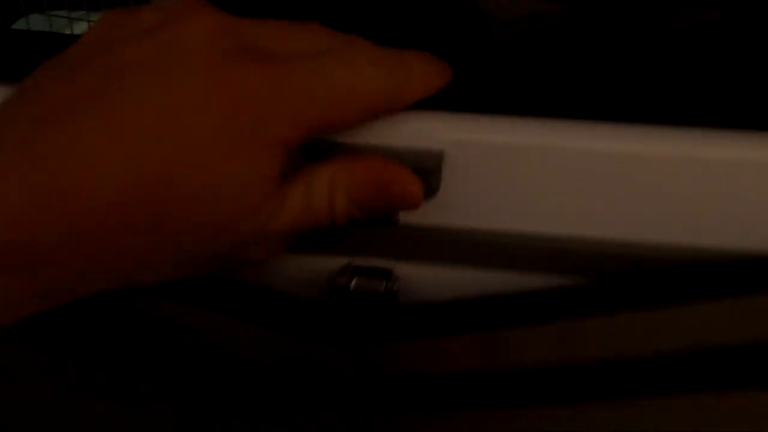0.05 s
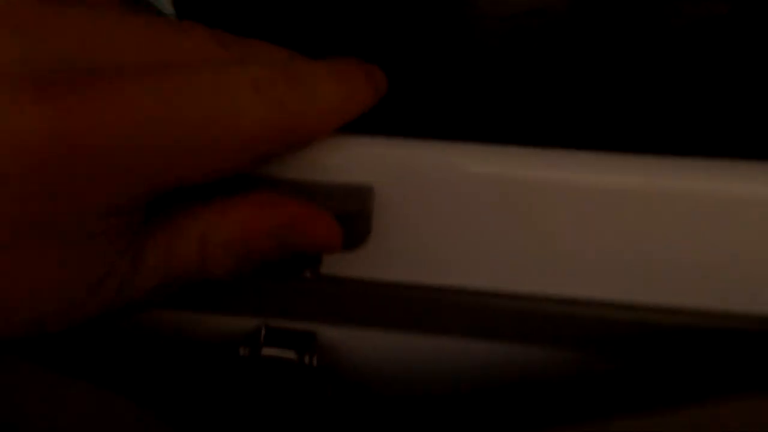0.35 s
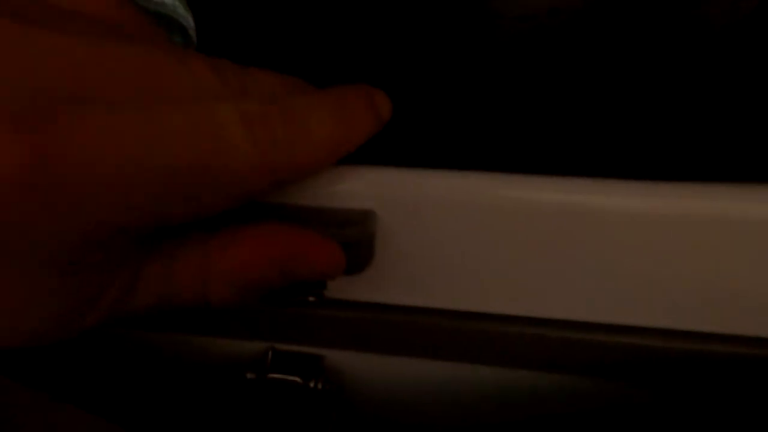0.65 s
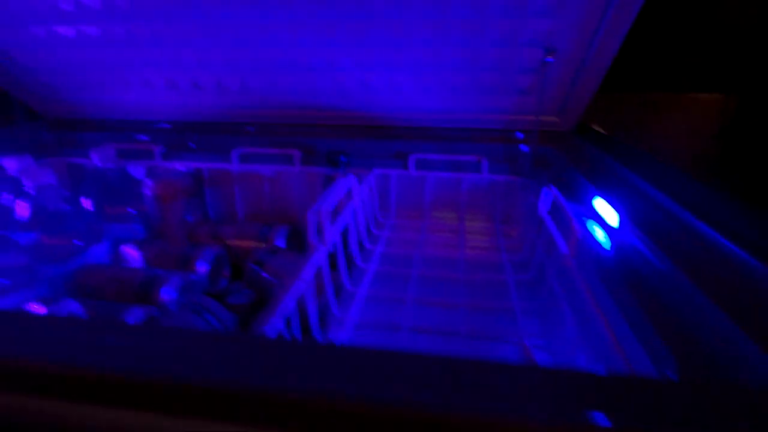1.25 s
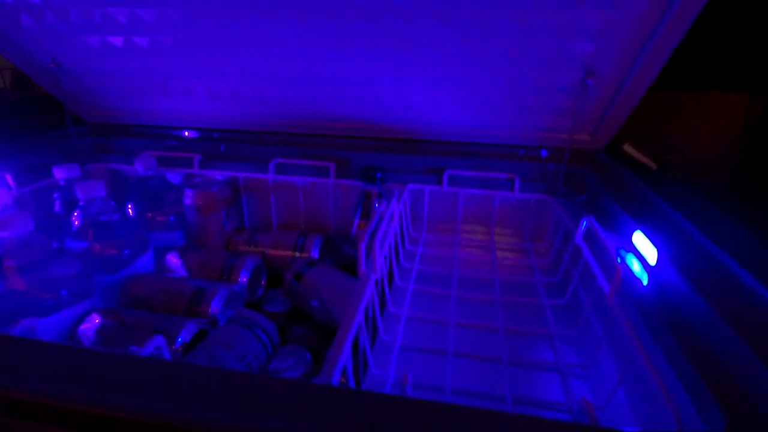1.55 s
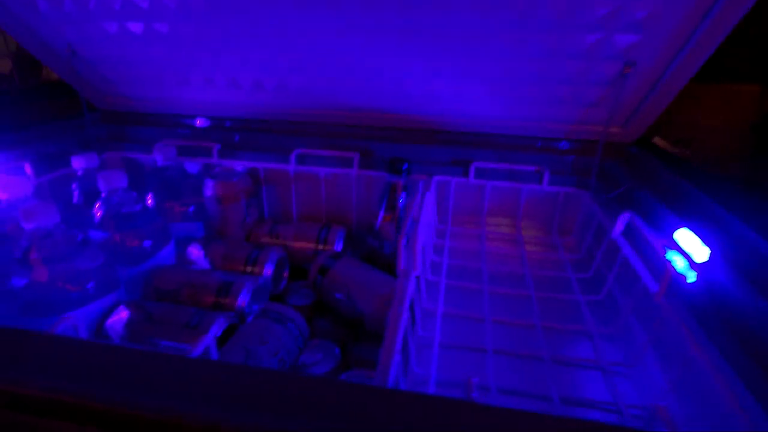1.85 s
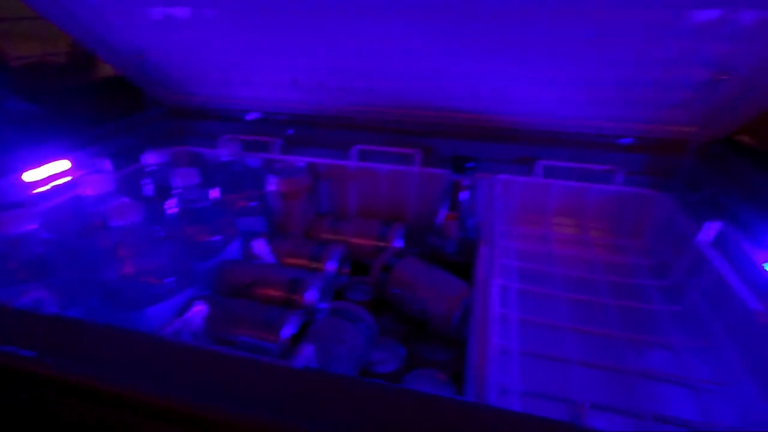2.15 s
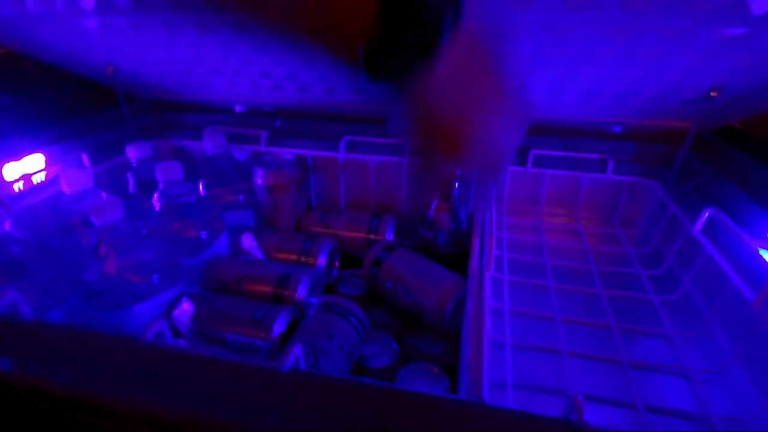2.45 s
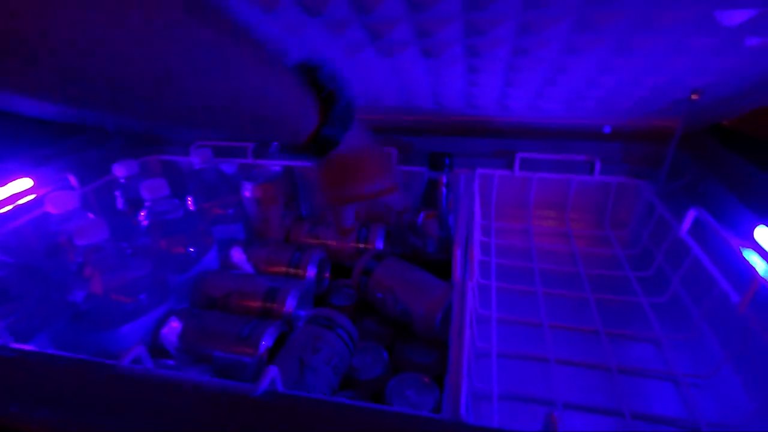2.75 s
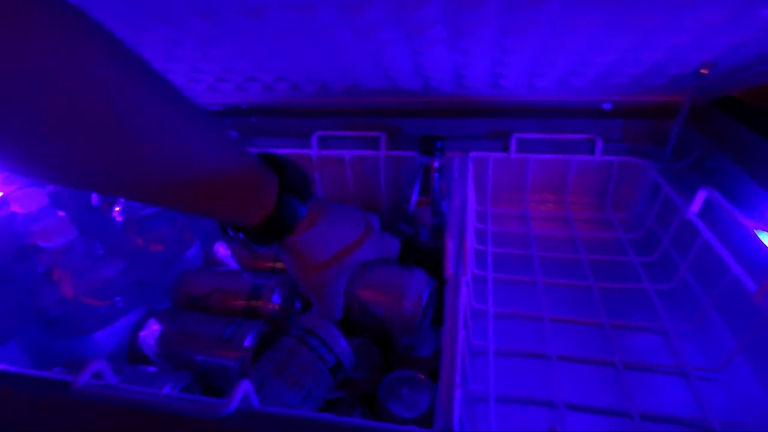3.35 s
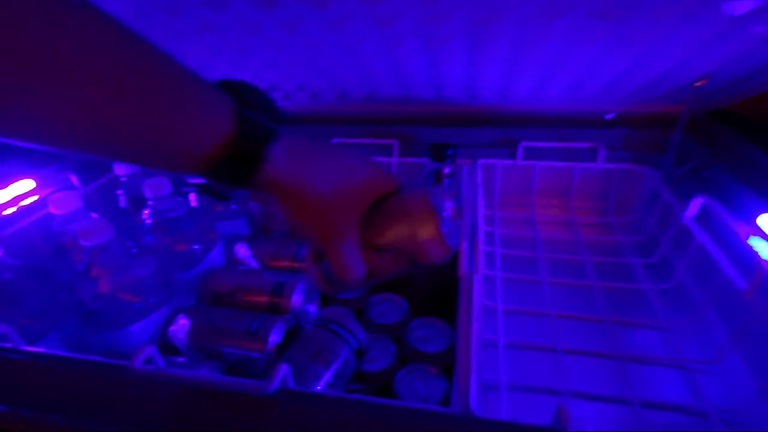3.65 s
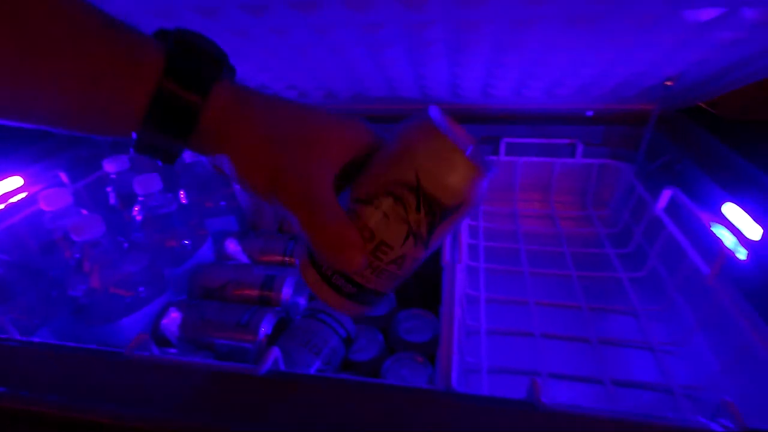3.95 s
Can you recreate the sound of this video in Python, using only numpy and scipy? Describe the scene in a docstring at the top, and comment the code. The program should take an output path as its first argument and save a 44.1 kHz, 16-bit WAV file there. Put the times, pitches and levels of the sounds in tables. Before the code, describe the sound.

A chest cooler lid opens with a short rubber slurp, ticking hinges and a thump. An arm then rustles inside and drink cans clatter against the hollow liner. The cooler's motor and fan hum throughout, heard close indoors.

```python
"""A refrigeration motor throbs steadily under the rush of its fan. A sleeve rustles and fingers creak
on the lid of a chest cooler. The rubber seal peels free with a short slurp, the flexing lid groans,
the hinges tick, and a spring rasps as the lid thumps against its stop. An arm rustles in among the
drinks and pulls out a full can, which knocks against its neighbours and the booming liner."""
import sys
import numpy as np
from scipy import signal
from scipy.fft import rfft, irfft
from scipy.io import wavfile

SR = 44100
rng = np.random.default_rng(int(sys.argv[2]) if len(sys.argv) > 2 else 0)


def bounce(signal):
    """Save signal as a 16-bit WAV file at the path given by the first command-line argument."""
    frames = np.transpose(np.atleast_2d(signal))
    limited = np.clip(frames, -1, 1)
    pcm = np.round(limited * 32767).astype(np.int16)
    wavfile.write(sys.argv[1], SR, pcm)


N = 176400
TIME = np.arange(N) / SR


def amp(db):
    return 10 ** (np.asarray(db) / 20)


def unit_rms(x):
    return x / np.sqrt(np.mean(x ** 2) + 1e-20)


def at_hz(table, hz):
    """Table value on a log-frequency axis."""
    table_hz, value = np.transpose(table)
    return np.interp(np.log(hz + 1), np.log(table_hz + 1), value)


def envelope(table):
    """Gain curve from (time [s], level [dB])."""
    return amp(np.interp(TIME, *np.transpose(table)))


def add(mix, start_s, sound):
    part = mix[round(start_s * SR):][:len(sound)]
    part += sound[:len(part)]


def spectral_gain(spectrum, hz, tilt_db_oct):
    return amp(at_hz(spectrum, hz) + tilt_db_oct * np.log2(np.maximum(hz, 200)))


def colour(x, spectrum):
    """x shaped by a spectrum, rms 1."""
    hz = np.fft.rfftfreq(len(x), 1 / SR)
    return unit_rms(irfft(rfft(x) * spectral_gain(spectrum, hz, 0), len(x)))


def drift(rate_hz):
    """Random wander up to about rate_hz, rms 1."""
    lowpass = np.exp(-(np.fft.rfftfreq(N, 1 / SR) / rate_hz) ** 2)
    return unit_rms(irfft(rfft(rng.standard_normal(N)) * lowpass, N))


def grains(spread_db):
    """Noise in uneven clumps, as from friction."""
    return rng.standard_normal(N) * amp(spread_db * drift(260))


def decaying_noise(samples, t60_table):
    """Noise with a separate decay per octave."""
    octave = np.log2(np.fft.rfftfreq(samples, 1 / SR) + 1)
    centres = np.arange(7, 15)
    bins = rfft(rng.standard_normal(samples))
    out = np.zeros(samples)
    for centre in centres:
        band = irfft(bins * np.interp(octave, centres, centres == centre), samples)
        out += band * np.exp(-np.log(1000) * TIME[:samples] / at_hz(t60_table, 2. ** centre))
    return out


def crack(spectrum, t60_table, tilt_db_oct=0):
    """Dense, brief ringing of a contact: decaying noise through a minimum-phase filter."""
    hz = abs(np.fft.fftfreq(4096, 1 / SR))
    log_gain = np.log(spectral_gain(spectrum, hz, tilt_db_oct))
    taps = np.fft.ifft(np.exp(np.conj(signal.hilbert(log_gain)))).real[:len(hz) // 2]
    onset_boost = amp(2 * np.exp(-TIME[:SR // 2] / 0.00058))
    burst = onset_boost * decaying_noise(SR // 2, t60_table)
    return signal.fftconvolve(burst, taps / np.linalg.norm(taps))


def ring(modes, rise_s=0.0012, detune=0, vary_db=2):
    """Damped modes; each blow scatters their levels and, with detune, their pitches."""
    t = TIME[:SR]
    out = np.zeros(SR)
    for hz, db, t60_s in modes:
        level_draw, pitch_draw = rng.standard_normal(2)
        decay = amp(db + vary_db * level_draw) * np.exp(-np.log(1000) * t / t60_s)
        out += decay * np.sin(2 * np.pi * hz * (1 + detune * pitch_draw) * t)
    return out * (1 - np.exp(-t / rise_s))


# Motor hum: (shaft order [1], level [dB])
HUM_ORDERS = [(1, -27.5), (2, -24.5), (3, -42.5), (4, -43.5), (5, -45), (6, -36.5), (7, -44), (8, -50.5),
              (10, -49.5), (13, -53), (14, -68), (19, -77), (20, -57.5)]
# Rumble: (frequency [Hz], relative density [dB])
RUMBLE_SPECTRUM = [(10, -18), (20, -11), (34, -27), (48, -3.5), (62, -0.5), (85, -11.5), (110, 9), (140, 1),
                   (180, -6), (230, -9.5), (330, -10), (450, -16), (600, -47), (1200, -73.5)]
# Hum and rumble swells: (time [s], gain [dB])
HUM_ENVELOPE = [(0, 0), (.4, -0.5), (.8, 2.5), (1.15, -3.5), (1.35, -0.5), (1.8, -4.5), (2.3, 0.5),
                (3.3, 1), (3.65, -0.5), (3.87, -7.5), (4, -4.5)]
RUMBLE_ENVELOPE = [(0, 1.5), (.5, -0.5), (.85, 1), (1.05, 0), (1.2, -0.5), (1.6, -0.5), (1.85, -3),
                   (2.3, 0), (2.6, -0.5), (3.3, 0), (3.65, 3.5), (3.87, -7.5), (4, -3.5)]
SHAFT_HZ = 23.9


def motor(waver=0.0036, flutter_db=2.02, rumble_db=-30.5):
    """Wavering shaft orders over a low rumble."""
    turns = np.cumsum(SHAFT_HZ * (1 + waver * drift(3.88))) / SR
    hum = np.zeros(N)
    for order, db in HUM_ORDERS:
        peak = np.sqrt(2) * amp(db + flutter_db * drift(2.7))
        hum += peak * np.sin(2 * np.pi * (order * turns + rng.random()))
    rumble = amp(rumble_db) * colour(rng.standard_normal(N), RUMBLE_SPECTRUM)
    return hum * envelope(HUM_ENVELOPE) + rumble * envelope(RUMBLE_ENVELOPE)


# Fan air and treble hiss: (frequency [Hz], relative density [dB])
AIR_SPECTRUM = [(260, -26), (450, -5.5), (600, 2), (786, -1.5), (1000, -5), (1250, -7), (1500, -9),
                (1850, -9), (2200, -13), (2600, -17.5), (3310, -18.5), (4640, -29), (7420, -34),
                (10000, -43), (12600, -63), (15000, -69.5)]
HISS_SPECTRUM = [(1200, -26), (2500, 6), (3500, 4.5), (5000, -7.5), (7500, -6), (10000, -19.5),
                 (12600, -25.5), (15000, -38)]
# Air and hiss swells: (time [s], gain [dB])
AIR_ENVELOPE = [(0, 2), (.45, 3), (.75, 0.5), (1.1, 0.5), (1.4, 2), (1.62, -5.5), (1.75, -4.5), (2, -3.5),
                (2.25, -2.5), (2.35, -1), (3.1, -3.5), (3.4, -4), (3.65, -2), (3.9, -10), (4, -10)]
HISS_ENVELOPE = [(0, -58.5), (.35, -61.5), (.75, -61), (1.15, -60), (1.4, -56), (1.53, -63), (1.7, -80),
                 (2.25, -79), (2.35, -64), (3.2, -61), (3.35, -57.5), (3.7, -56), (3.9, -65.5), (4, -69)]
# Cabinet and fan tones: (frequency [Hz], level [dB])
FAN_TONES = [(361, -57), (587, -64.5), (1077, -64), (1590, -63), (1852, -68), (3290, -69)]


def fan(air_db=-46, throb_db=0.9, flutter_db=1.2, tone_waver=0.005):
    """Air throbbing at twice the shaft rate, fine hiss, and faint tones that come and go."""
    throb = amp(throb_db * np.sin(2 * np.pi * 2 * SHAFT_HZ * TIME) + flutter_db * drift(25))
    air = amp(air_db) * colour(rng.standard_normal(N), AIR_SPECTRUM) * throb * envelope(AIR_ENVELOPE)
    hiss = colour(grains(3.0), HISS_SPECTRUM) * envelope(HISS_ENVELOPE)
    tones = np.zeros(N)
    for hz, db in FAN_TONES:
        gain = amp(db) * drift(7.6)
        tones += gain * np.sin(2 * np.pi * np.cumsum(hz * (1 + tone_waver * drift(21.2))) / SR)
    return air + hiss + tones


# Arm strokes: (peak time [s], rise [s], fall [s], level [dB])
ARM_STROKES = [(.13, 0.035, 0.034, -55.5), (.3, 0.077, .05, -58.5), (.48, 0.045, 0.07, -57.5),
               (.59, 0.037, 0.049, -56), (.73, 0.032, .04, -55.5), (.87, 0.035, 0.14, -48),
               (2.15, 0.049, .05, -58.5), (2.31, 0.032, 0.05, -59.5), (2.57, 0.16, 0.06, -53.5),
               (2.76, 0.17, 0.13, -52.5), (2.92, 0.089, 0.16, -46.5), (3.13, 0.036, 0.057, -58),
               (3.26, 0.054, 0.021, -55), (3.55, 0.067, 0.23, -48.5)]
# Cloth and skin: (frequency [Hz], relative density [dB])
RUSTLE_SPECTRUM = [(300, -29), (1000, -1.5), (2200, 4.5), (4000, 4.5), (6500, -2), (9000, -6), (12000, -21),
                   (15000, -25)]


def arm_rustle():
    """Cloth and skin rub in grainy strokes."""
    strokes = np.zeros(N)
    for peak_s, rise_s, fall_s, db in ARM_STROKES:
        width_s = np.where(TIME < peak_s, rise_s, fall_s)
        strokes += amp(db) * np.exp(-((TIME - peak_s) / width_s) ** 2)
    return strokes * colour(grains(spread_db=1.5), RUSTLE_SPECTRUM)


# Finger creak: (frequency [Hz], relative density [dB])
GRIP_SPECTRUM = [(800, -26), (1400, 4), (1800, 10), (2300, -19), (4000, -21), (8000, -23), (15000, -39)]


def finger_grip(peak_s=0.41, width_s=0.064, db=-46.5, slip_hz=100.9, jitter=0.15, decay_cycles=0.22):
    """Fingers creak on the lid's edge in quick slips."""
    cycles = np.cumsum(slip_hz * (1 + jitter * drift(30))) / SR
    slips = np.exp(-(cycles % 1) / decay_cycles)
    swell = amp(db) * np.exp(-((TIME - peak_s) / width_s) ** 2)
    return swell * colour(slips * rng.standard_normal(N), GRIP_SPECTRUM)


# Seal peeling: (time [s], gap resonance [Hz], slurp [dB], hiss [dB])
SEAL_PEEL = [(0.794, 400, -48, -53), (.809, 601, -36, -47), (0.814, 794, -22.5, -31.5),
             (0.83, 1003, -20, -28), (.842, 1145, -23.5, -29.5), (.846, 1212, -30, -24.5),
             (0.853, 1277, -24.5, -32.5), (.864, 1090, -35, -29.5), (.876, 1007, -28.5, -37),
             (.89, 907, -43, -43), (.94, 850, -60, -57)]
# Inrushing air: (frequency [Hz], relative density [dB])
INRUSH_SPECTRUM = [(200, 10), (450, 11), (650, 18), (900, 6), (1500, -2.5), (2800, 4.5), (4000, -7.5),
                   (5300, -11), (6300, -4), (7500, -17), (10000, -29), (15000, -39)]


def seal_peel(cycles_per_flap=4, jitter=0.05, pole_width_hz=650, noise_mix=0.4, squeak_mix=0.6):
    """The gasket flutters; flutter and gap resonance rise and fall together while air hisses in."""
    times_s, *columns = np.transpose(SEAL_PEEL)
    gap_hz, slurp_db, hiss_db = (np.interp(TIME, times_s, column) for column in columns)
    flap_hz = gap_hz / cycles_per_flap * np.exp(jitter * drift(224))
    flaps = np.diff(np.floor(np.cumsum(flap_hz) / SR), prepend=0)
    drive = unit_rms(flaps) + noise_mix * rng.standard_normal(N)
    # Moving resonance: shift down by gap_hz, low-pass, shift back.
    carrier = np.exp(2j * np.pi * np.cumsum(gap_hz) / SR)
    pole = np.exp(-np.pi * pole_width_hz / SR)
    resonance = carrier * signal.lfilter([1], np.poly([pole] * 3), drive / carrier)
    slurp = unit_rms(unit_rms(resonance.real) + squeak_mix * carrier.imag)
    hiss = colour(grains(0.92), INRUSH_SPECTRUM)
    peeling = (TIME > times_s[0]) & (TIME < times_s[-1])
    return (amp(slurp_db) * slurp + amp(hiss_db) * hiss) * peeling


# Lid flexes: (time [s], length [s], first pitch [Hz], last pitch [Hz], level [dB], overtone gain [dB])
LID_GROANS = [(.874, 0.05, 132.5, 105, -16.5, -10), (.956, 0.06, 166, 150, -21.5, -23),
              (1.022, 0.039, 172, 103, -16, -15), (1.455, 0.052, 85, 117, -8.5, -28),
              (1.512, 0.065, 127.5, 152, -14.5, -12)]


def lid_groans(waver=0.04, skew=0.66):
    """The flexing lid sounds short low notes that bend in pitch."""
    out = np.zeros(N)
    for start_s, length_s, first_hz, last_hz, db, overtone_db in LID_GROANS:
        progress = np.linspace(0, 1, round(length_s * SR))
        glide_hz = first_hz + (last_hz - first_hz) * progress
        phase = 2 * np.pi * np.cumsum(glide_hz * (1 + waver * drift(55)[:len(progress)])) / SR
        tone = np.sin(phase) + amp(overtone_db) * (np.sin(2 * phase) + np.sin(3 * phase) / 3)
        swell = np.sin(np.pi * progress ** skew) ** 2
        add(out, start_s, amp(db) * swell * tone)
    return out


# Hinge ticks: (time [s], tick [dB], hollow knock [dB], lid ring [dB])
HINGE_TICKS = [(.9585, -28, -24, -25), (.982, -45, -43, -32), (1.012, -50, -36, -32),
               (1.025, -47, -32, -28), (1.0855, -33.5, -27, -39), (1.235, -37, -32, -50)]
# Tick colour: (frequency [Hz], relative density [dB])
TICK_SPECTRUM = [(150, 0), (400, 1), (800, -4), (2100, -2), (3500, -5.5), (5000, -21), (9000, -32.5),
                 (15000, -51)]
# Tick decay: (frequency [Hz], t60 [s])
TICK_DECAY = [(200, .12), (2000, .05), (9000, .024)]
# Lid's hollow knock and ring: (frequency [Hz], gain [dB], t60 [s])
HOLLOW_MODES = [(344, 8, 0.053), (400, -2, 0.099), (476, -14, 0.049), (714, -16, 0.036)]
LID_MODES = [(116, 3, 0.11), (156, 4, 0.076), (189.4, -0.5, 0.44), (270, -18, 0.24), (305, -19, 0.18),
             (417, -20, 0.092)]


def hinge_ticks():
    """Each tick knocks the hollow lid and sets it ringing."""
    out = np.zeros(N)
    for start_s, tick_db, knock_db, ring_db in HINGE_TICKS:
        add(out, start_s, amp(tick_db) * crack(TICK_SPECTRUM, TICK_DECAY))
        add(out, start_s, amp(knock_db) * ring(HOLLOW_MODES, rise_s=0.002, detune=0.021))
        add(out, start_s, amp(ring_db) * ring(LID_MODES, rise_s=0.0018))
    return out


# Spring rasp: (frequency [Hz], relative density [dB])
SPRING_SPECTRUM = [(200, 4), (500, -2), (900, 3.5), (3500, -2.5), (5000, -12), (8000, -18), (12000, -25),
                   (15500, -38)]


def spring_rasp(full_at_s=1.457, rise_s=0.0076, hold_s=0.026, fade_s=0.0046, db=-33.5):
    """A burst of friction from the lid's spring."""
    t = TIME - full_at_s
    burst = np.exp(np.minimum(t, 0) / rise_s - np.maximum(t - hold_s, 0) / fade_s)
    return amp(db) * burst * colour(grains(3.3), SPRING_SPECTRUM)


# Blows on the stop: (time [s], thud [dB], hollow knock [dB], lid ring [dB])
STOP_BLOWS = [(1.461, -18, -22, -25), (1.485, -30.5, -26, -24), (1.656, -43, -46, -28.5)]
# Thud: (frequency [Hz], gain [dB], t60 [s])
THUD_MODES = [(65, -11, 0.062), (192, -6, 0.08), (288, 5.5, 0.072)]


def lid_stop():
    """The lid thuds against its stop and settles."""
    out = np.zeros(N)
    for start_s, thud_db, knock_db, ring_db in STOP_BLOWS:
        add(out, start_s, amp(thud_db) * ring(THUD_MODES, rise_s=0.0056))
        add(out, start_s, amp(knock_db) * ring(HOLLOW_MODES))
        add(out, start_s, amp(ring_db) * ring(LID_MODES, rise_s=0.0017))
    return out


# Handling clicks: (time [s], level [dB], tilt [dB/octave])
HANDLING_CLICKS = [(1.474, -42, 5.5), (1.553, -51.5, 3.5), (1.594, -44.5, 0.5), (1.635, -49, 1.5),
                   (1.801, -54.5, 4.5), (2.281, -45, 3), (2.317, -43.5, 0.5), (2.37, -46.5, 2),
                   (2.523, -32, 0), (2.541, -36, 3.5), (2.567, -41.5, 3), (2.641, -42, -1.5),
                   (2.722, -47, -5), (2.882, -41, 3.5), (2.914, -41, 5), (2.98, -38.5, 3.5),
                   (3.015, -47.5, 2), (3.278, -41.5, -0.5), (3.472, -59, -10)]
# Click colour: (frequency [Hz], relative density [dB])
CLICK_SPECTRUM = [(300, -4), (1000, 8), (2000, -4), (4200, -6.5), (8000, -18), (11000, -33.5), (15000, -51)]
# Click decay: (frequency [Hz], t60 [s])
CLICK_DECAY = [(500, 0.11), (8000, 0.083)]


def handling_clicks():
    """Small contacts as the arm moves."""
    out = np.zeros(N)
    for start_s, db, tilt_db_oct in HANDLING_CLICKS:
        add(out, start_s, amp(db) * crack(CLICK_SPECTRUM, CLICK_DECAY, tilt_db_oct))
    return out


# Rim taps: (time [s], ring [dB], tick [dB])
RIM_TAPS = [(3.383, -37.5, -39.5), (3.391, -43, -46), (3.412, -53, -48)]
# Can rim: (frequency [Hz], gain [dB], t60 [s])
RIM_MODES = [(2630, -18, .06), (3370, -9, .04), (3870, -4, 0.044), (4040, 3, 0.041), (4700, -5, 0.044),
             (6000, -18, .07), (7510, -8, .023)]
# Rim tick: (frequency [Hz], relative density [dB])
RIM_SPECTRUM = [(500, -20), (2000, -6), (3200, 4), (4400, 0), (5300, -10), (8000, -17), (10000, -23),
                (15000, -40)]


def rim_taps():
    """Lightly tapped can rims tick and ring."""
    out = np.zeros(N)
    for start_s, ring_db, tick_db in RIM_TAPS:
        add(out, start_s, amp(ring_db) * ring(RIM_MODES))
        add(out, start_s, amp(tick_db) * crack(RIM_SPECTRUM, CLICK_DECAY))
    return out


# Can knocks: (time [s], clatter [dB], tilt [dB/octave], body [dB], end [dB], liner boom [dB])
CAN_KNOCKS = [(3.498, -34, 2.5, -42, -24.5, -46), (3.505, -27, -2, -38, -25, -24.5),
              (3.5515, -20.5, 2.5, -32, -14, -20.5), (3.559, -24, -0.5, -27, -34, -35),
              (3.574, -20, -4.5, -30, -24, -22.5), (3.586, -36, -9, -35, -31, -34),
              (3.655, -18.5, 2, -23, -27, -27), (3.661, -21, 1.5, -38, -28, -15.5),
              (3.686, -15.5, 1, -21.5, -37, -33), (3.693, -17.5, -2, -20.5, -35, -9),
              (3.720, -18, -3, -32, -33, -14.5), (3.755, -25, -3.5, -45, -53, -19),
              (3.783, -33, -5.5, -52, -55, -27)]
# Clatter, and cans buzzing on the liner: (frequency [Hz], relative density [dB])
CLATTER_SPECTRUM = [(100, -21.5), (280, 17), (460, 7), (600, 3), (900, 3.5), (1150, 0), (1650, 1.5),
                    (2000, -2), (2500, -3), (3400, -3), (4200, -12.5), (4900, -15), (6000, -25),
                    (8500, -32), (12000, -41.5), (15500, -54)]
CHATTER_SPECTRUM = [(400, -17), (700, 5), (1500, 2), (2500, -3.5), (4000, -20), (8000, -33), (15000, -42)]
# Clatter decay: (frequency [Hz], t60 [s])
CLATTER_DECAY = [(200, 0.23), (1000, 0.15), (3000, 0.079), (9000, 0.12)]
# Can body, can end, liner: (frequency [Hz], gain [dB], t60 [s])
BODY_MODES = [(890, -9, .06), (1297, -8, .15), (1610, -9, .09), (1827, -1, .055), (2200, -3, .08),
              (2370, -3, .05), (2821, -10, .03), (3330, -7, .028), (4450, -16, .03)]
END_MODES = [(2390, 2, .035), (2520, -6, .09), (3140, -9, .045), (3680, -13, .035), (4900, -12, .03),
             (7080, -23, .05)]
LINER_MODES = [(192.6, 4.5, 0.14), (210, -9, 0.093), (262, -8.5, 0.13), (325.3, -8, 0.25),
               (428.6, -9.5, 0.17), (489.6, -7.5, 0.15), (698, -19, 0.17), (793, -13, 0.096)]


def can_knocks(chatter_gain_db=-17.5):
    """The full can knocks its neighbours; they chatter on each swing of the booming liner."""
    cans, boom = np.zeros((2, N))
    for start_s, clatter_db, tilt_db_oct, body_db, end_db, boom_db in CAN_KNOCKS:
        add(cans, start_s, amp(clatter_db) * crack(CLATTER_SPECTRUM, CLATTER_DECAY, tilt_db_oct))
        add(cans, start_s, amp(body_db) * ring(BODY_MODES, detune=0.0196))
        add(cans, start_s, amp(end_db) * ring(END_MODES, detune=0.0103))
        add(boom, start_s, amp(boom_db) * ring(LINER_MODES, rise_s=0.0018))
    chatter = np.maximum(boom, 0) * colour(rng.standard_normal(N), CHATTER_SPECTRUM)
    return cans + boom + amp(chatter_gain_db) * chatter


# Reflections inside the cooler: (delay [s], gain [dB])
WALL_ECHOES = [(.0031, -26), (.0047, -20.5), (.0062, -23), (.0093, -22)]


def cooler_walls(x, highpass_hz=500):
    """x plus quick reflections of its upper range off the liner and lid."""
    bright = signal.sosfilt(signal.butter(2, highpass_hz, "high", fs=SR, output="sos"), x)
    out = x.copy()
    for delay_s, db in WALL_ECHOES:
        add(out, delay_s, amp(db) * bright)
    return out


# Room decay: (frequency [Hz], t60 [s])
ROOM_DECAY = [(150, 0.87), (600, 0.68), (3000, 0.26), (10000, 0.48)]


def room_tail(x, gain_db=-14.5, rise_s=0.0011):
    """Short diffuse reverberation."""
    tail = decaying_noise(SR, ROOM_DECAY) * (1 - np.exp(-TIME[:SR] / rise_s))
    return amp(gain_db) * signal.fftconvolve(x, tail / np.linalg.norm(tail))[:N]


def scene():
    """Motor and fan under the reverberant handling sounds, mono."""
    machine = motor() + fan()
    rustle = arm_rustle()
    opening = finger_grip() + seal_peel() + lid_groans() + hinge_ticks() + spring_rasp() + lid_stop()
    reaching = handling_clicks() + rim_taps() + can_knocks()
    near = cooler_walls(rustle + opening + reaching)
    return (machine + near + room_tail(near))[None]


def record(dry):
    """Low-pass at 15.7 kHz."""
    lowpass = signal.firwin(511, 15700, window=("kaiser", 9), fs=SR)
    return signal.oaconvolve(dry, lowpass[None], "same")


dry = scene()
out = record(dry)
bounce(out)
```